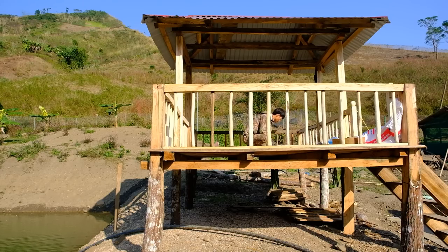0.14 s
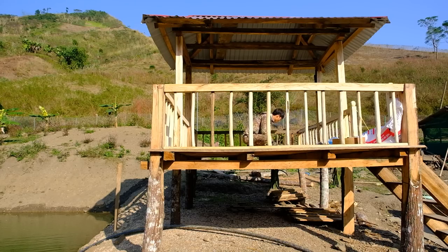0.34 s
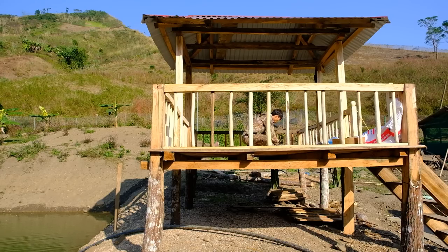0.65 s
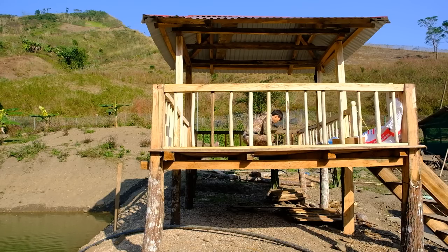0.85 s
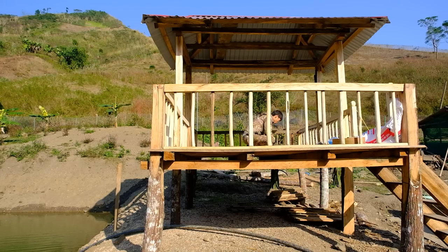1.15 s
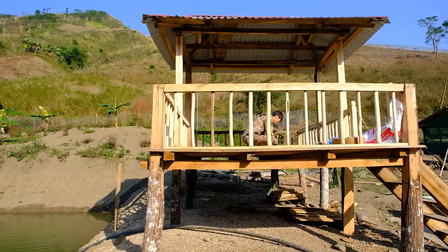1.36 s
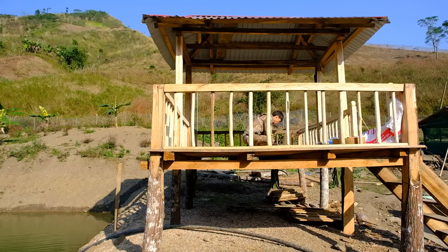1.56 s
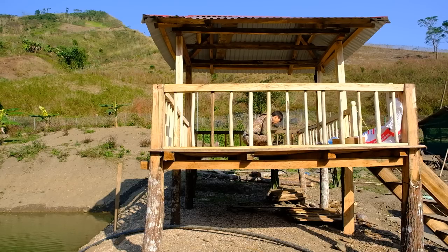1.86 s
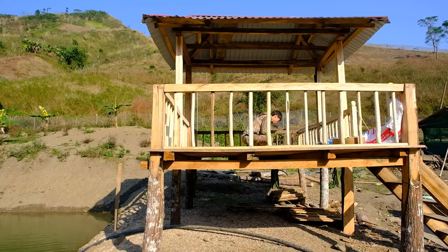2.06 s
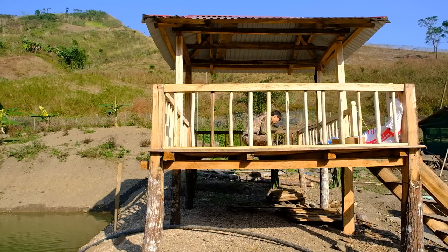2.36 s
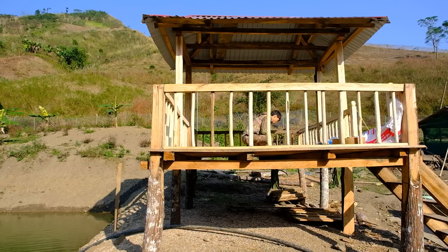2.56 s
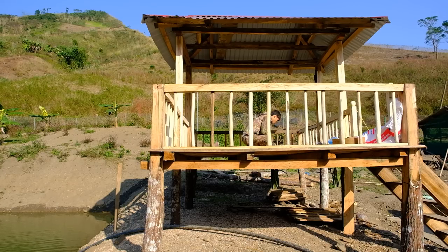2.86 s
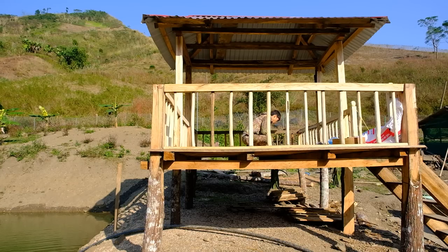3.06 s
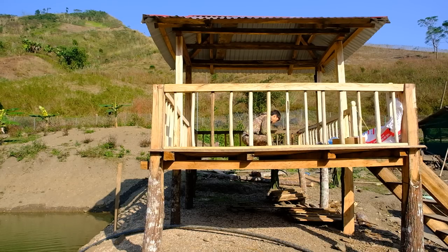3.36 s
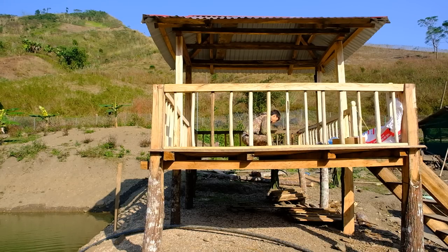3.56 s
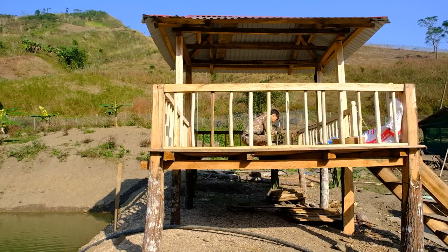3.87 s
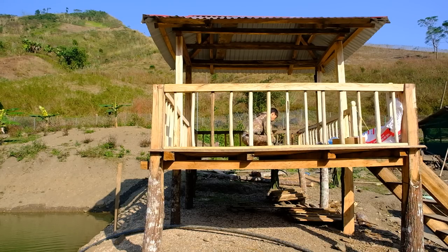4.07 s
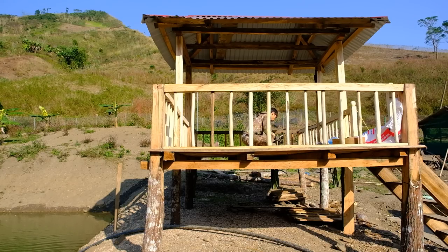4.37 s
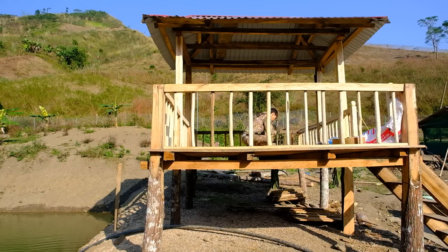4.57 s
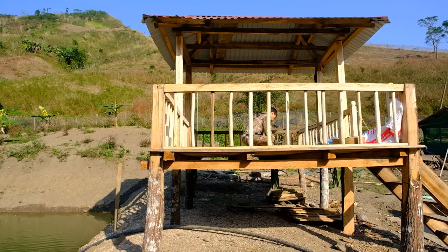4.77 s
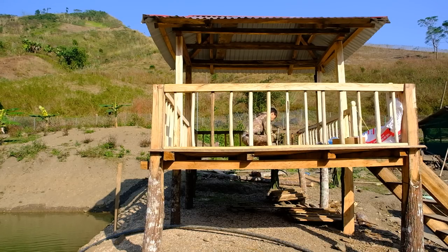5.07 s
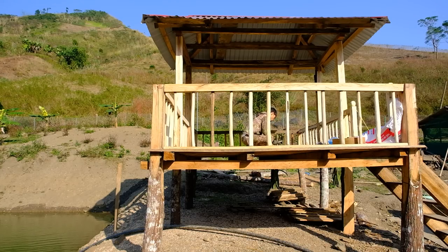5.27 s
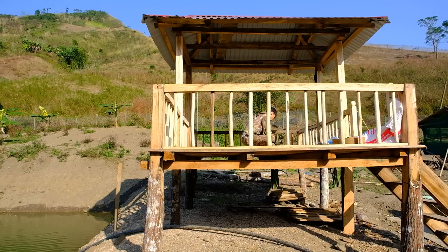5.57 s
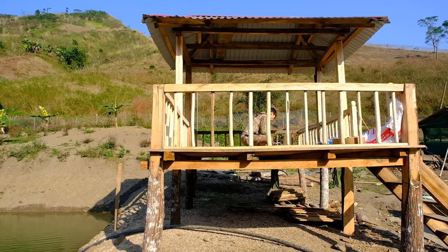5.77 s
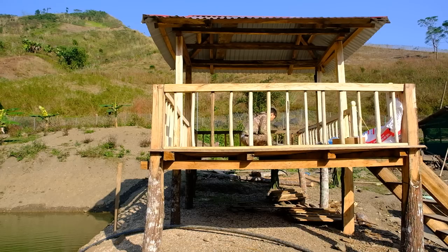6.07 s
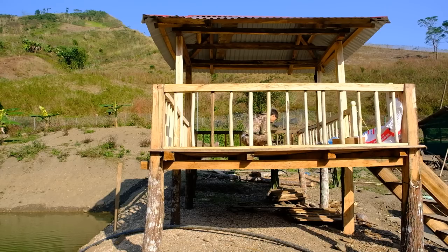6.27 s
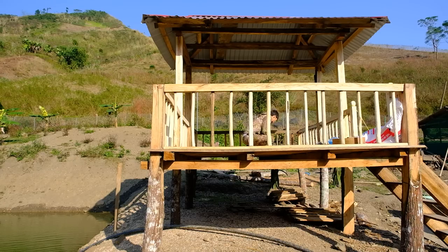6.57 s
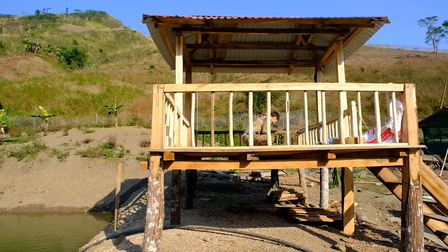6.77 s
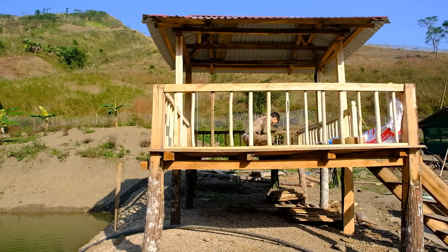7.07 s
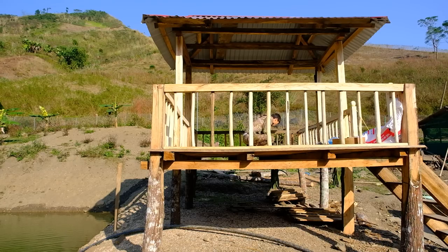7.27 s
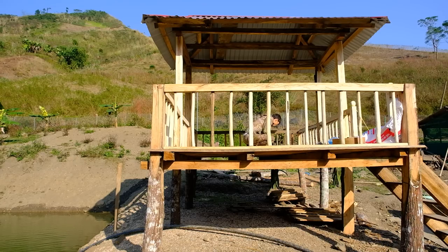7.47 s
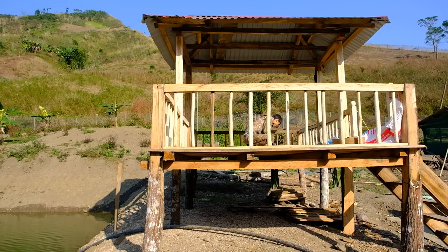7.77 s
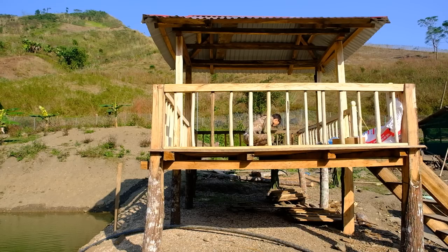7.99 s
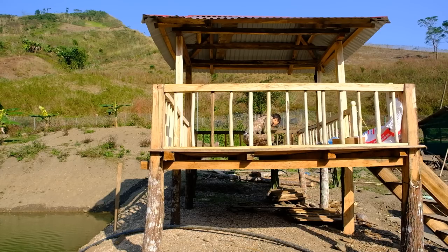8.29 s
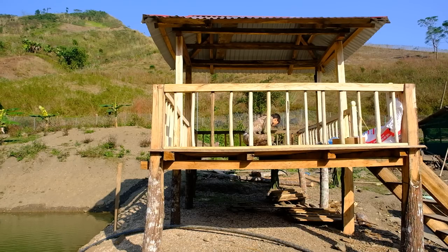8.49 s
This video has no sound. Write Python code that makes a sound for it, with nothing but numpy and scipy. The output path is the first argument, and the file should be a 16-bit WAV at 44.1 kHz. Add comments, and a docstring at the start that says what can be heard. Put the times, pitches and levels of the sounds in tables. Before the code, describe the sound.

Outdoors, wood bumps on boards and a hammer strikes a nail four times with a steel ring, over softly splashing water.

```python
"""On a raised wooden deck by a pond, a carpenter shifts timber, then drives a nail with four hard blows.
Knocks and blows ring the same boards; the hammer adds a crack and a steel ring, and the overloaded
microphone thumps and clips. A faint echo comes back from the hillside. In the background water pours
and splashes into the pond, all bubbles and spray, and a light breeze rumbles on the microphone."""
import sys
import numpy as np
from scipy import signal
from scipy.fft import rfft, irfft
from scipy.io import wavfile
from scipy.ndimage import uniform_filter1d

SR = 44100
rng = np.random.default_rng(int(sys.argv[2]) if len(sys.argv) > 2 else 0)


def unload_wav(signal):
    """Save mono or channel-first audio to the path in sys.argv[1] as 16-bit WAV at rate SR, clipped to [-1, 1]."""
    wavfile.write(
        sys.argv[1],
        SR,
        np.round(np.clip(np.atleast_2d(signal).T, -1, 1) * 32767).astype(np.int16),
    )


N = 380583
TIME = np.arange(N) / SR
AGE = TIME[:SR]  # seconds since an impact
TOP_HZ = 15900

# breeze at the microphone between gusts: t/s, level/dB
BREEZE_LEVELS = [(0, -66), (1.0, -59.5), (2.1, -80), (2.8, -69), (3.7, -73.5), (6.2, -60), (7.1, -68),
                 (8.63, -64)]
# gusts at their peaks: t/s, level/dB
GUST_PEAKS = [(1.42, -47.5), (7.75, -57)]
# spectrum of the pouring water: f/Hz, level/dB
STREAM_SPECTRUM = [(71, -63), (120, -14.5), (196, -13), (250, -7), (423, -7.5), (611, -6.5), (662, -7),
                   (899, 0.5), (1460, -10.5), (1760, -4.5), (2750, -9), (4050, -7), (5840, -17.5),
                   (7010, -18), (8000, -23), (15500, -29.5)]
# the clearest single drops: t/s, level/dB
CLEAR_DRIPS = [(3.2526, -47), (4.001, -40.5), (8.036, -43), (8.0582, -41), (8.317, -44), (8.5363, -42)]
# the loudest splashes: t/s, level/dB, top octave/dB
POND_SPLASHES = [(0.613, -26.5, -8), (1.012, -28, -4), (1.368, -31, -5), (1.615, -30, -11),
                 (1.707, -26, -12), (2.3729, -25.5, -10), (3.2927, -30, -25), (3.38, -32, -9),
                 (3.7884, -30.5, -22), (5.0161, -26, -7), (6.172, -25.5, -3), (6.598, -24.5, -9),
                 (6.892, -31, 0), (7.456, -29.5, -26), (8.427, -30.5, 4)]
# surfacing bubbles: t/s, starting f/Hz, length/s, peak level/dB
BUBBLE_CHIRPS = [(0.501, 1830, 0.0033, -30), (2.209, 1870, .012, -35.5), (6.996, 3690, 0.017, -35)]
# modes of the deck: f/Hz, level/dB, t60/s
DECK_MODES = [(158, -54, 0.26), (178.3, -16.5, 0.32), (204, -16.5, 0.27), (240.3, -9.5, 0.29),
              (265, -17, 0.44), (303.7, -7.5, 0.19), (331, -5, 0.2), (367.6, -5, 0.16), (433, -18, 0.17),
              (462.4, -2, 0.21), (511.5, -20, 0.52), (506, 1.5, 0.17), (545.3, -1, 0.17), (574, 0.5, 0.16),
              (619, 9.5, 0.081), (694.4, 1.5, 0.14), (738, -19, 0.34), (751, -7, 0.32), (770.4, -1.5, 0.13),
              (805, -5.5, 0.27), (870, -3, 0.17), (901, -8, 0.28), (993, -14, 0.14), (1082, -27, 0.29),
              (1174, -9.5, 0.16), (1466, -7.5, 0.14)]
# bands of dense plank modes: f/Hz, level/dB, t60/s
PLANK_BANDS = [(59, -67, 0.2), (114, -25.5, 0.28), (214, -15, 0.27), (480, -8.5, 0.3), (838, -5.5, 0.24),
               (1366, -6, 0.22), (2370, -7.5, 0.2), (3240, -3, 0.16), (5540, -4.5, 0.13),
               (8100, -12.5, 0.15), (10600, -10, 0.12), (15100, -17.5, 0.13)]
# partials of nail and hammer face: f/Hz, level/dB, t60/s
STEEL_MODES = [(2888, -2, .13), (3228, 1, .14), (3466, 2, .16), (3898, -4, .2), (4143, 1, .2),
               (4716, -13, .22), (5545, -18, .3), (5850, -10, .12), (7355, -10, .24), (8030, -17, .22),
               (9870, -9, .22), (11980, -22, .2), (12410, -22, .22), (13750, -18, .19), (14600, -14, .17)]
# long, beating ring of the hammer head: f/Hz, level/dB, t60/s
HEAD_MODES = [(8548, 0, .8), (8558, -2, .5)]
# tool and nails tapping the boards: t/s, level/dB, centre f/Hz
TOOL_TAPS = [(0.959, -30, 896), (1.015, -33.5, 980), (1.715, -32, 2450), (1.879, -35, 1230),
             (2.686, -30, 840), (2.712, -27, 1640), (6.215, -21.5, 1190), (6.594, -24.5, 940),
             (7.094, -30.5, 880), (7.528, -33.5, 950), (7.705, -29, 1910), (8.149, -24, 1030),
             (8.172, -30.5, 1040), (8.607, -27.5, 940)]
# timber set down and nudged: t/s, level/dB, contact hardness/dB
TIMBER_KNOCKS = [(0.37, -38, -5), (0.517, -12.5, 3), (0.632, -8.5, 17), (0.683, -10, 2), (0.824, -24, 0),
                 (1.201, -34, -9), (1.486, -16, 1.5), (1.585, -27.5, -10), (2.04, -37.5, -2),
                 (2.138, -22, 21), (2.15, -25, 18.5), (6.28, -18, 1), (6.293, -14, 2.5)]
# hammer blows, the first just before the start: t/s, force/dB, crack/dB, low, middle and high
# nail ring/dB, head ring/dB, nailed board f/Hz, its ring/dB
HAMMER_BLOWS = [(-.3, 0, 0, 2, 0, 0, -2, 780, 6), (4.1127, -2, 2, -3, -22, 1, -2.5, 770, -32),
                (4.7461, -3, 3, -1, 5, -2.5, -31, 780, -11),
                (5.1946, -2.5, 3.5, -5, 2, 0, -10.5, 886, -3.5),
                (5.6612, -2, 1, -5, 0, -22, -2.5, 936, 3.5)]


def undb(db):
    """Decibels to gain."""
    return 10 ** (np.asarray(db) / 20)


def unit(x):
    """Scale to rms 1."""
    return x / np.sqrt(np.mean(x ** 2))


def unit_attack(x):
    """Scale so that the first 20 ms have rms 1."""
    return x / np.sqrt(np.mean(x[:SR // 50] ** 2))


def add(out, s, x):
    """Mix x into out from time s on; what comes before zero is lost."""
    i = int(s * SR)
    x, i = x[max(-i, 0):], max(i, 0)
    out[i:i + len(x)] += x[:N - i]


def bandpass(x, low_hz, high_hz, order=2):
    """Butterworth band filter."""
    return signal.sosfilt(signal.butter(order, [low_hz, high_hz], "band", fs=SR, output="sos"), x)


def resonate(x, hz, width_hz):
    """One resonance, gain 1 at the centre."""
    return signal.lfilter(*signal.iirpeak(hz, hz / width_hz, fs=SR), x)


def colour(x, points):
    """Shape x with a spectrum of (f/Hz, level/dB) points; rms 1."""
    hz, db = np.transpose(points)
    f = np.fft.rfftfreq(len(x), 1 / SR) + 1
    gain = undb(np.interp(np.log(f), np.log(hz), db))
    return unit(irfft(rfft(x) * gain, len(x)))


def fade(t60):
    """Exponential decay, one second long."""
    return np.exp(-np.log(1000) * AGE / t60)


def waver(per_s):
    """Smooth random drift, rms 1."""
    hold = int(SR / per_s)
    steps = np.repeat(rng.standard_normal(N // hold + 1), hold)
    return unit(uniform_filter1d(uniform_filter1d(steps, hold), hold)[:N])


def wind(rise_s=0.034, fall_s=0.14):
    """A light breeze rumbles on the microphone; two gusts swell fast and die away slowly."""
    strength = undb(np.interp(TIME, *np.transpose(BREEZE_LEVELS)))
    for s, db in GUST_PEAKS:
        strength += undb(db) * np.exp(-np.maximum((s - TIME) / rise_s, (TIME - s) / fall_s))
    rumble = [(8, -5), (35, 4.5), (85, 7.5), (170, -5), (600, -48), (3000, -90)]
    return strength * colour(rng.standard_normal(N), rumble)


def droplets(per_s, spread_db, size):
    """Random droplet impacts: many small, a few large."""
    hits = rng.random(size) < per_s / SR
    sign = np.sign(rng.standard_normal(size))
    weight = np.minimum(rng.exponential(size=size), 6)
    return unit(hits * sign * undb(spread_db * weight))


def fizz(per_s, spread_db, q, size):
    """Tiny bubbles in 22 sizes, each ringing briefly at its own pitch; per_s is the rate at 4 kHz."""
    return unit(sum(resonate(droplets(per_s * np.sqrt(hz / 4000), spread_db, size), hz, hz / q)
                    for hz in np.geomspace(600, 15000, 22)))


def stream(level_db=-43.5, waver_db=0.6, hiss_db=-3, flutter_db=1.36, gurgle_db=-10):
    """Water falls steadily in the background: bubbles and spray over the gurgle of the hollow it digs."""
    bubbles = fizz(per_s=260, spread_db=2.77, q=7.7, size=N)
    spray = bubbles + undb(hiss_db) * rng.standard_normal(N)
    pour = colour(spray * undb(flutter_db * waver(per_s=75)), STREAM_SPECTRUM)
    gurgle = unit(resonate(droplets(per_s=900, spread_db=3.4, size=N), hz=880, width_hz=130))
    return (pour + undb(gurgle_db) * gurgle) * undb(level_db + waver_db * waver(per_s=4.2))


def drips(pitch_hz=3970, width_hz=1500, t60=0.023, stray_per_s=7, stray_db=-51.5):
    """Lone drops give short, bright ticks near one pitch; fainter strays fall at random."""
    out = np.zeros(N)
    stray_times = np.cumsum(-np.log(rng.random(150))) / stray_per_s
    stray_levels = stray_db + 2.5 * rng.standard_normal(150)
    for s, db in CLEAR_DRIPS + list(zip(stray_times, stray_levels)):
        hz = pitch_hz * (1 + 0.039 * rng.standard_normal())
        impact = rng.standard_normal(SR // 10) * fade(t60)[:SR // 10]
        if s < TIME[-1]:
            tick = resonate(resonate(impact, hz, width_hz), hz, width_hz)
            add(out, s, undb(db) * unit_attack(tick))
    return out


def splashes(level_db=-10, ref_db=-29, ref_t60=0.1, doubling_db=5):
    """Lumps of water slap the pond in bursts of bubbles; the more water, the longer the burst."""
    out = np.zeros(N)
    foam = fizz(per_s=1500, spread_db=0.85, q=1.7, size=2 * SR)
    for s, db, top in POND_SPLASHES:
        t60 = ref_t60 * 2 ** ((db - ref_db) / doubling_db)
        spectrum = [(300, -21), (900, 14), (2700, 1), (4100, 12), (6000, -4.5),
                    (11000, top - 4.5), (16000, top - 13)]
        burst = colour(np.roll(foam, rng.integers(2 * SR))[:SR], spectrum)
        add(out, s, undb(db + level_db) * unit_attack(burst * fade(t60)))
    return out


def bubble_chirps(rise_ratio=1.17):
    """A bubble's pitch climbs quickly as it surfaces."""
    out = np.zeros(N)
    for s, start_hz, length_s, db in BUBBLE_CHIRPS:
        hz = start_hz * np.linspace(1, rise_ratio, int(length_s * SR))
        add(out, s, undb(db) * np.hanning(len(hz)) * np.sin(2 * np.pi * np.cumsum(hz) / SR))
    return out


def hillside(level_db=-23, t60=1.067, build_s=0.018):
    """The faint, dull tail that slopes and trees scatter back from a distance."""
    spectrum = [(30, -42), (70, -19), (150, 2), (280, 6.5), (550, -1), (950, 0),
                (2000, -15.5), (4000, -11.5), (6500, -23), (14000, -39)]
    tail = colour(rng.standard_normal(SR), spectrum)
    return undb(level_db) * tail * fade(t60) * (1 - np.exp(-AGE / build_s))


def ring(modes, phases, stretch=1):
    """Sum of freely decaying modes; stretch scales their decay times."""
    return sum(undb(db) * fade(t60 * stretch) * np.sin(2 * np.pi * hz * AGE + phase)
               for (hz, db, t60), phase in zip(modes, phases))


def planks(stretch=1):
    """Plank modes too dense to tell apart: bands of noise, each with its own decay."""
    centres = np.array(PLANK_BANDS)[:, 0]
    edges = np.r_[centres[0] / 2, np.sqrt(centres[1:] * centres[:-1]), TOP_HZ]
    return sum(undb(db) * fade(t60 * stretch) * unit(bandpass(rng.standard_normal(SR), lo, hi, order=3))
               for (_, db, t60), lo, hi in zip(PLANK_BANDS, edges, edges[1:]))


def taps(level_db=-8, tick_db=4, ref_db=-24, halving_db=8):
    """Small hard contacts: a sharp tick, then one board rings; a lighter tap dies sooner."""
    out = np.zeros(N)
    for s, db, hz in TOOL_TAPS:
        stretch = 2 ** ((db - ref_db) / halving_db)
        contact = planks(stretch) * (1 + undb(tick_db) * fade(t60=0.039))
        board = bandpass(resonate(contact, hz, width_hz=0.73 * hz), hz / 3, 4800)
        add(out, s, undb(db + level_db) * unit_attack(board))
    return out


def knocks(deck_phases, level_db=-7, planks_db=7, echo_db=-2, halving_db=68):
    """Wood on wood is a soft contact: mainly the middle modes of the deck answer."""
    out = np.zeros(N)
    for s, db, hardness in TIMBER_KNOCKS:
        # a harder contact is damped sooner and trades bass for treble
        stretch = 2 ** (-hardness / halving_db)
        tone = [(280, 7 - hardness), (600, 0), (900, 0), (1600, -16 + 0.85 * hardness)]
        deck = ring(DECK_MODES, deck_phases + 0.5 * rng.standard_normal(len(DECK_MODES)), stretch)
        wood = unit_attack(deck + undb(planks_db) * planks(stretch))
        knock = colour(wood + undb(echo_db) * hillside(), tone)
        knock = bandpass(knock * (AGE < 0.7), 190, 1650, order=4)
        add(out, s, undb(db + level_db) * unit_attack(knock))
    return out


def nail_ring(low_db, middle_db, high_db, q=150):
    """Steel partials blurred by reflections between floor and roof: each flutters in a narrow band."""
    out = np.zeros(SR)
    for hz, db, t60 in STEEL_MODES:
        # the nail favours other partials as the wood grips more of it
        grip_db = np.interp(hz, [4200, 5500, 7400, 9800], [low_db, middle_db, middle_db, high_db])
        decay = fade(t60)
        partial = resonate(rng.standard_normal(2 * SR), hz, hz / q)[SR:] * decay
        out += undb(db + grip_db) * partial * np.linalg.norm(decay) / np.linalg.norm(partial)
    return out


def overload_thump(hz=38, db=-15, t60=0.097):
    """Low thump of the overloaded microphone at each blow."""
    return ring([(hz, db, t60)], phases=[0])


def hammer(deck_phases, crack_db=-1, nail_db=-8, head_db=-27, board_t60=0.17, build_s=0.0063):
    """Hammer on nail: steel and crack sound at once; the heavy deck takes milliseconds to get going."""
    out = np.zeros(N)
    build = 1 - np.exp(-AGE / build_s)
    for s, force, crack, low, middle, high, head, board_hz, board_db in HAMMER_BLOWS:
        deck = ring(DECK_MODES, deck_phases + 0.26 * rng.standard_normal(len(DECK_MODES)))
        board = ring([(board_hz, board_db, board_t60)], phases=[0])
        steel = undb(nail_db) * nail_ring(low, middle, high)
        steel += undb(head_db + head) * ring(HEAD_MODES, phases=[0, 0])
        wood = build * (deck + board) + undb(crack_db + crack) * planks()
        add(out, s, undb(force) * (wood + steel + hillside() + build * overload_thump()))
    return out


def scene():
    """One channel: work on the deck in front, the pond behind, the breeze on the microphone."""
    # the deck's modes start roughly in step, so a knock flutters
    deck_phases = np.pi / 2 + rng.standard_normal(len(DECK_MODES))
    carpentry = hammer(deck_phases) + knocks(deck_phases) + taps()
    pond = stream() + splashes() + bubble_chirps() + drips()
    return (carpentry + pond + wind())[None]


def record(dry):
    """The blows overload the microphone and clip hard at full scale; the top is cut."""
    top_cut = signal.ellip(8, 0.05, 50, TOP_HZ, fs=SR, output="sos")
    return signal.sosfiltfilt(top_cut, np.clip(dry, -1, 1))


dry = scene()
out = record(dry)
unload_wav(out)
```